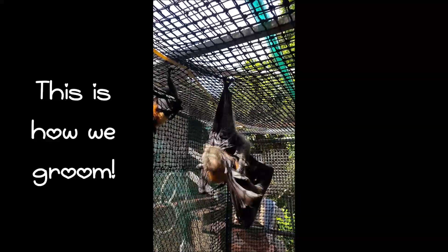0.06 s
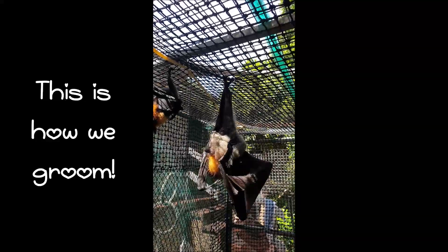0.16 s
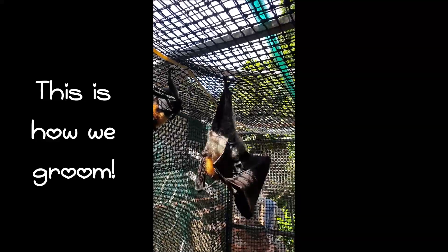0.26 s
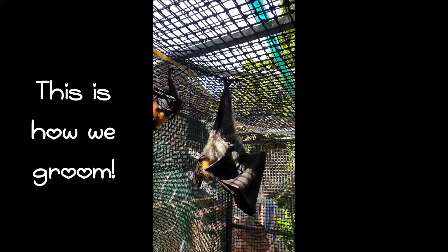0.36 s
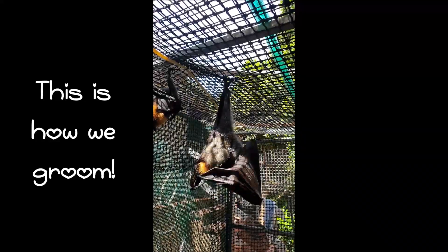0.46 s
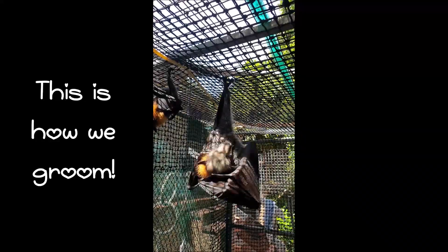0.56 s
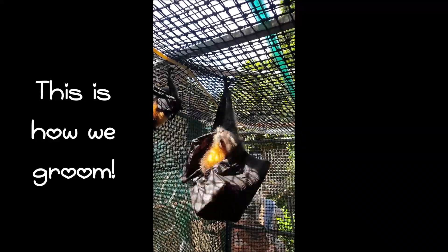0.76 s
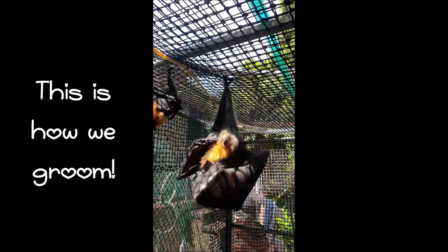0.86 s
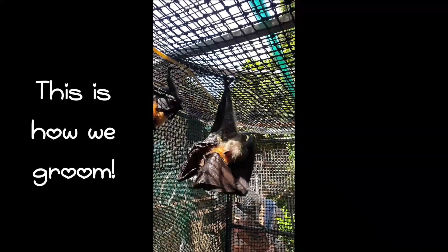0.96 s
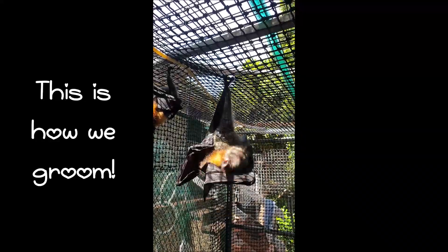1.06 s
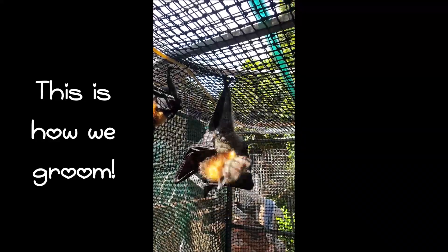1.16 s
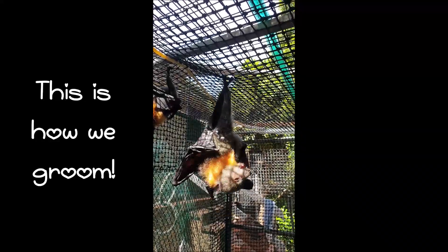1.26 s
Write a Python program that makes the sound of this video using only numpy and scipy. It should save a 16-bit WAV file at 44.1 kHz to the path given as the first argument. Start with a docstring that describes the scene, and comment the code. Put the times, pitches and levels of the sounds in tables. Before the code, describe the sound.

In a netted outdoor enclosure, a nearby fruit bat screeches once, shrill and raspy with airy hiss, smeared by quick reflections. Afterwards come tiny taps, barely audible rustles, soft rumble and a far engine slowly rising.

```python
"""In a netted outdoor enclosure a fruit bat gives one harsh screech: harmonics of a shrill pitch that rises to
a ceiling, flutters irregularly below it and sags at the end, shaped by throat resonances and hiss.
Dense decaying reflections smear it and leave a faint tail. Light taps are noise bursts driving resonances;
faint rustles and far calls are soft swells of band-limited noise. Beneath lie broadband rumble, thin wide
hiss and a distant engine, two low harmonics that slowly rise in pitch."""
import sys
import numpy as np
from scipy import signal
from scipy.fft import rfft, irfft
from scipy.io import wavfile
from scipy.ndimage import uniform_filter1d, map_coordinates

SR = 44100
rng = np.random.default_rng(int(sys.argv[2]) if len(sys.argv) > 2 else 0)


def dump(signal):
    """Clip the signal to [-1, 1] and save it as 16-bit WAV at the path in sys.argv[1]."""
    limited = np.clip(np.atleast_2d(signal).T, -1, 1)
    pcm = np.round(limited * 32767).astype(np.int16)
    wavfile.write(sys.argv[1], SR, pcm)


N = 57330  # samples


def undb(db):
    """Amplitude ratio: 20 dB is a factor of ten."""
    return 10 ** (np.asarray(db) / 20)


def unit(x):
    """Normalization of mean power: scale to rms 1."""
    return x / np.sqrt(np.mean(x ** 2))


def curves(table):
    """Linear interpolation in time: one curve for each column after the first."""
    rows = np.array(table, float)
    t = np.arange(N) / SR
    return [np.interp(t, rows[:, 0], column) for column in rows.T[1:]]


def colour(x, points, scale=1):
    """Spectral shaping: multiply the spectrum by gains joined between (hz, db) points on a log axis."""
    point_hz, point_db = np.array(points, float).T
    hz = np.maximum(np.arange(N + 1) * SR / (2 * N), 1)
    gain_db = scale * np.interp(np.log(hz), np.log(point_hz), point_db)
    return irfft(rfft(x, 2 * N) * undb(gain_db))[..., :N]


def resonate(x, hz, width_hz):
    """Second-order resonance in cascade: applied twice, it gives a narrower peak with steeper skirts."""
    b, a = signal.iirpeak(min(hz, SR / 3), hz / width_hz, fs=SR)
    once = signal.lfilter(b, a, x)
    return signal.lfilter(b, a, once)


def wander(rate):
    """Smooth random modulation: spread near 1, about `rate` new values a second."""
    position = np.arange(N) / SR * rate + 2
    return map_coordinates(rng.standard_normal(4096), [position], order=2, mode="mirror")


def pan(db):
    """Interaural level difference: left and right gains, positive db toward the left."""
    return undb(np.array([[db], [-db]]) / 2)


def background():
    """Diffuse-field noise: the lows are alike in both ears, the highs spread wide."""
    # rumble and hiss spectrum: hz, relative_db
    spectrum_points = [(15, -54), (25, -29), (50, 3), (86, -5.5), (119, -5), (188, -16), (233, -17),
                       (421, -28.5), (469, -32), (567, -34), (1850, -45), (2700, -46), (4260, -48.5),
                       (8580, -50.5), (15500, -48.5)]
    # side signal against mid: hz, side_db
    width_points = [(60, -27), (150, -13), (350, -6), (1000, -2.5), (10000, 0)]
    level_db = -54.5
    mid, side = unit(colour(rng.standard_normal((2, N)), spectrum_points))
    return undb(level_db) * (mid + np.array([[1], [-1]]) * colour(side, width_points))


def engine(drift=0.013):
    """Periodic firing as a harmonic series: two low partials with random pitch drift and level waver."""
    # distant engine: start_s, firing_hz, first_harmonic_db, second_harmonic_db
    engine_table = [(0, 100.7, -61.5, -96), (.25, 103.8, -65, -114), (.35, 104.4, -58.5, -69),
                    (.5, 108.2, -57.5, -72.5), (.65, 113.3, -58, -54.5), (.74, 114.2, -50.5, -68.5),
                    (.85, 116.3, -54.5, -58), (.97, 115.9, -53, -65), (1.08, 119.1, -56.5, -67.5),
                    (1.3, 126.1, -52.5, -83)]
    waver_db = 2
    hz, first_db, second_db = curves(engine_table)
    phase = 2 * np.pi * np.cumsum(hz * (1 + drift * wander(25))) / SR
    total = 0
    for number, db in enumerate((first_db, second_db), start=1):
        total = total + undb(db + waver_db * wander(25)) * np.sin(number * phase)
    return np.sqrt(2) * total  # a sine's rms is its peak over sqrt(2)


def faint_swells(flicker_db=2):
    """Band-limited noise under slow envelopes: faint rustles and far calls with a flickering level."""
    # faint rustles and far calls: start_s, length_s, level_db, centre_hz, width_hz
    swell_table = [(0.077, 0.084, -71.5, 2860, 880), (0.17, 0.36, -71, 3170, 900),
                   (.25, 0.027, -68, 1310, 920), (0.716, 0.11, -69, 9100, 8100),
                   (1.018, 0.48, -74.5, 7530, 7380), (1.157, 0.066, -76, 2459, 201)]
    attack_s, release_s = 0.028, 0.14
    t = np.arange(N) / SR
    out = 0
    for start, length, db, hz, width_hz in swell_table:
        rise = np.clip((t - start) / attack_s, 0, 1)
        fall = np.clip((start + length - t) / release_s + .5, 0, 1)  # the fade is centred on the end
        level = undb(db + flicker_db * wander(43))
        noise = unit(resonate(rng.standard_normal((2, N)), hz, width_hz))
        out = out + rise * fall * level * noise
    return out


def reflections(x, t60_s):
    """Reverberation as convolution with exponentially decaying noise, independent at each ear."""
    delay_s = 0.0017  # silent for this long, then fading in over as long again
    t = np.arange(N) / SR
    decay = np.exp(-np.log(1000) * t / t60_s)  # 60 dB down at t60_s
    echo = rng.standard_normal((2, N)) * decay * np.clip(t / delay_s - 1, 0, 1)
    return signal.fftconvolve(x[None], unit(echo) / np.sqrt(N), axes=1)[:, :N]


def enclosure(x, room_db):
    """Superposition of direct sound, quick reflections off near surfaces and a longer coloured tail."""
    # spectrum of the tail: hz, relative_db
    tail_points = [(1000, -10), (3400, -10.5), (3850, -2), (4150, -4), (4450, -13), (8000, -8.5),
                   (12000, -15), (16000, -18)]
    left_lead_s, direct_pan_db = 0.000069, 5.5
    near_db, near_t60_s = 3.5, 0.24
    tail_db, tail_t60_s = -5, 0.63  # tail level before its colouring
    left = map_coordinates(x, [np.arange(N) + left_lead_s * SR], order=3)
    direct = np.array([left, x]) * pan(direct_pan_db)
    near = undb(near_db) * reflections(x, near_t60_s)
    tail = undb(tail_db) * colour(reflections(x, tail_t60_s), tail_points)
    return direct + undb(room_db) * (near + tail)


def bat(level_db=-5, room_db=0):
    """Source-filter voice: frequency-modulated harmonics and hiss pass through the throat's resonances."""
    # the screech: start_s, pitch_hz, relative_db, flutter_limit_hz
    screech_table = [(.233, 3270, -44.5, 19.8), (.243, 3599, -24.5, 40), (.256, 3836, -25, 105),
                     (.278, 3614, -28.5, 162), (.302, 4040, -27, 167), (.332, 3872, -25.5, 190),
                     (.36, 4008, -32, 210), (.38, 3778, -29, 340), (.416, 3915, -31.5, 380),
                     (.442, 3730, -30.5, 280), (.484, 3886, -31, 350), (.508, 3496, -36, 296.2),
                     (.565, 3488, -56, 280)]
    # harmonics 1 to 4: relative_db, closed_db (added while the mouth is closed)
    harmonic_table = [(-2, 0.5), (-3.5, -4), (-0.5, -17.5), (-13.5, -42.5)]
    # breath hiss spectrum: hz, relative_db
    hiss_points = [(2000, -37), (3400, -24), (5000, -15), (6700, 8), (9000, 7), (12500, -10.5),
                   (15500, -19)]
    # throat and mouth response, with a deep notch above the fundamental: hz, gain_db
    throat_points = [(2400, -32.5), (3050, -12.5), (3450, -4), (4130, 4), (4400, -29), (5700, -19),
                     (6400, -3.5), (7000, 2), (9000, -2), (10300, 0.5), (11500, -7), (14000, 3),
                     (15800, -7)]
    # left minus right: hz, difference_db
    lean_points = [(3500, 1.5), (4100, -1), (7000, 5.5), (8200, -15), (10500, -1.5), (12300, -8),
                   (15500, -1)]
    ceiling_hz, flutter_per_s, jitter_hz, jitter_per_s = 4033, 150, 50, 1100
    flutter_snap = 1.1  # how hard the pitch flips between its high and low states
    rasp_db, rasp_per_s = 3, 380
    throb_db, throb_per_s = 1.34, 94  # slower lurches of effort under the rasp
    opens_s, open_s = 0.2354, 0.27  # the mouth starts to open, and is fully open
    onset_s, release_s, hiss_db = .003, .015, -15.5
    t = np.arange(N) / SR
    hz, db, flutter_hz = (uniform_filter1d(c, size=200) for c in curves(screech_table))
    hz = hz + flutter_hz * np.tanh(flutter_snap * wander(flutter_per_s))
    hz = np.minimum(hz, ceiling_hz) + jitter_hz * wander(jitter_per_s)  # jitter rides on the ceiling too
    phase = 2 * np.pi * np.cumsum(hz) / SR

    closed = np.clip((open_s - t) / (open_s - opens_s), 0, 1)
    voice = 0
    for number, (harmonic_db, closed_db) in enumerate(harmonic_table, start=1):
        voice = voice + undb(harmonic_db + closed * closed_db) * np.sin(number * phase)
    hiss = undb(hiss_db) * (1 - closed) * unit(colour(rng.standard_normal(N), hiss_points))

    onset = np.clip((t - screech_table[0][0]) / onset_s, 0, 1)
    release = np.clip(1 - (t - screech_table[-1][0]) / release_s, 0, 1)
    uneven_db = rasp_db * wander(rasp_per_s) + throb_db * wander(throb_per_s)
    source = (voice + hiss) * onset * release * undb(level_db + db + uneven_db)
    left, right = enclosure(colour(source, throat_points), room_db)
    return np.array([colour(left, lean_points, .5), colour(right, lean_points, -.5)])


def taps():
    """Impulse excitation, perhaps claws on the netting: a brief burst drives a resonance, click and thud."""
    # light taps: start_s, level_db, resonance_hz, width_hz, click_db, thud_db (last two relative)
    tap_table = [(0.6482, -47, 1540, 1120, 5.5, -10.5), (.844, -54.5, 706, 330, -18.5, 3),
                 (1.167, -61.5, 1420, 1084, -18, -19)]
    # colour of the click: hz, relative_db
    click_points = [(1000, -15), (9000, 1), (15000, -9)]
    thud_hz, thud_width_hz = 341.3, 205
    decay_s, room_db = 0.00049, -6.5
    t = np.arange(N) / SR
    out = np.zeros(N)
    for start, db, hz, width_hz, click_db, thud_db in tap_table:
        burst = rng.standard_normal(N) * (t >= start) * np.exp(-np.abs(t - start) / decay_s)
        knock = unit(resonate(burst, hz, width_hz))
        click = undb(click_db) * unit(colour(burst, click_points))
        thud = undb(thud_db) * unit(resonate(burst, thud_hz, thud_width_hz))
        out += undb(db) * (knock + click + thud)
    # unit() averages over the whole scene: rescale to the burst's short length
    return enclosure(out * np.sqrt(2 * decay_s * SR / N), room_db)


def scene():
    """Linear superposition: the bat and small noises add to a background leaning left."""
    distant = pan(3) * (engine() + background())  # dB toward the left
    return distant + faint_swells() + bat() + taps()


def record(dry):
    """Band limiting: the recorder cuts the top with a steep elliptic low-pass."""
    top_hz, ripple_db, stop_db = 15700, .1, 80
    low_pass = signal.ellip(12, ripple_db, stop_db, top_hz, fs=SR, output="sos")
    return signal.sosfilt(low_pass, dry)


dry = scene()
out = record(dry)
dump(out)
```